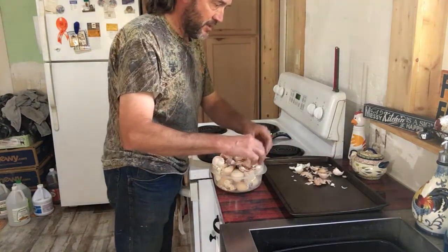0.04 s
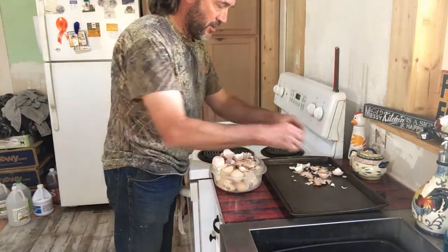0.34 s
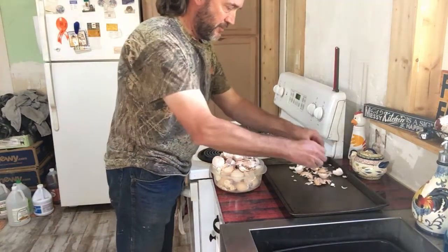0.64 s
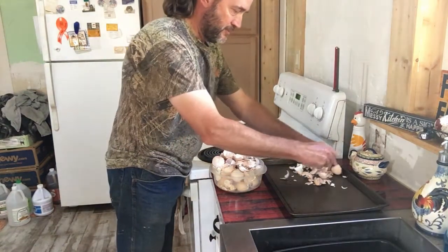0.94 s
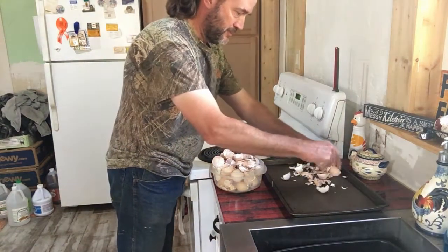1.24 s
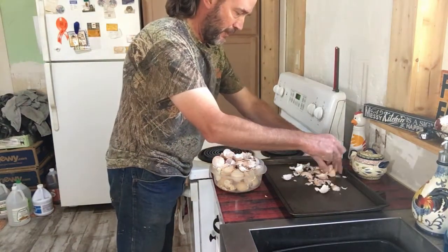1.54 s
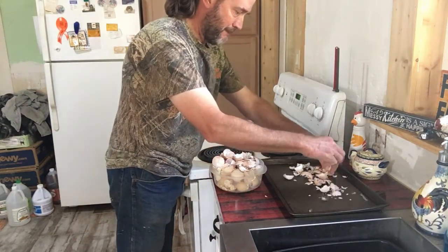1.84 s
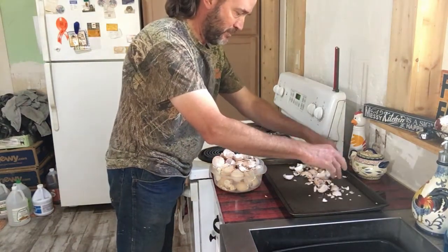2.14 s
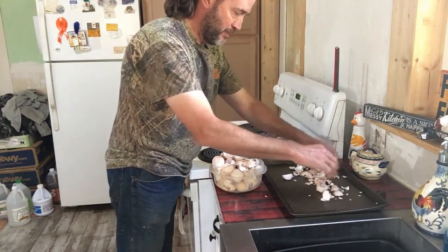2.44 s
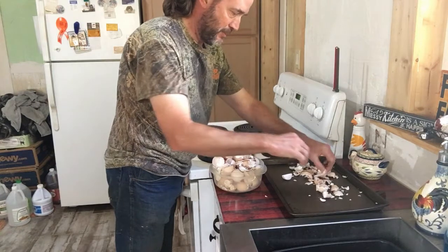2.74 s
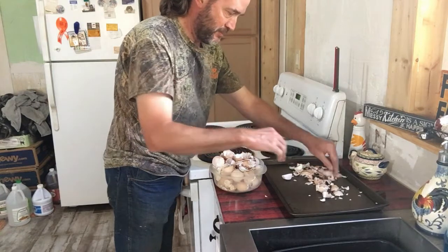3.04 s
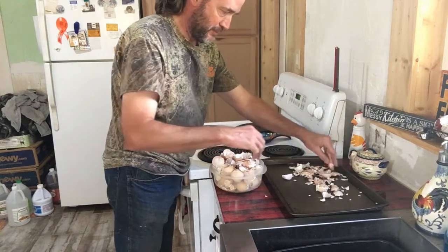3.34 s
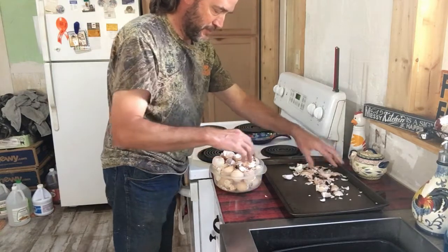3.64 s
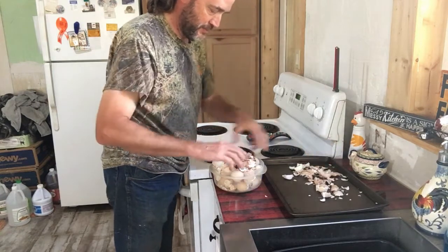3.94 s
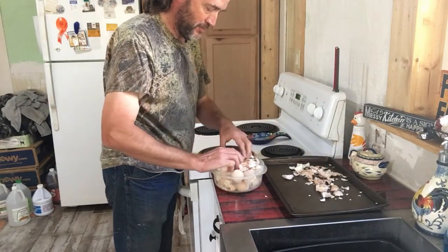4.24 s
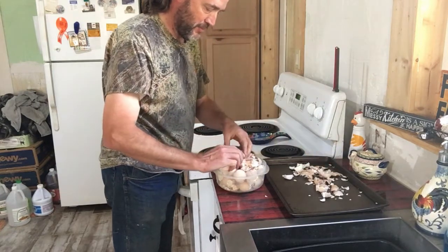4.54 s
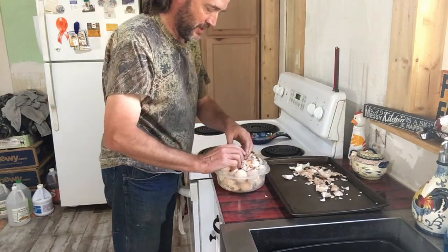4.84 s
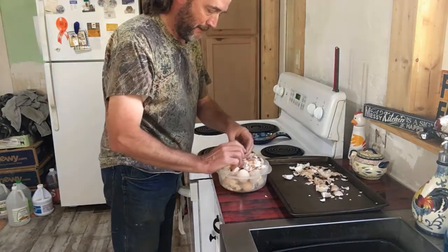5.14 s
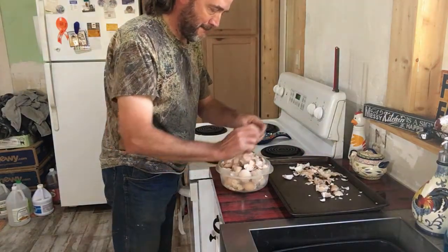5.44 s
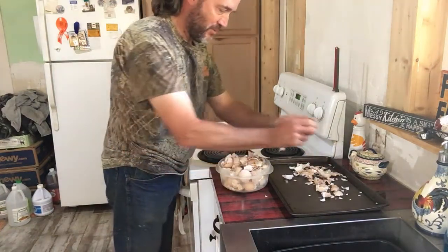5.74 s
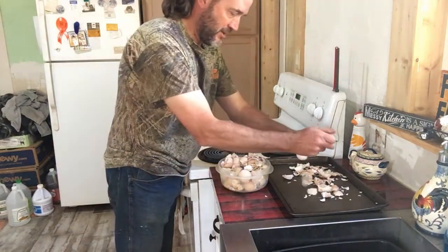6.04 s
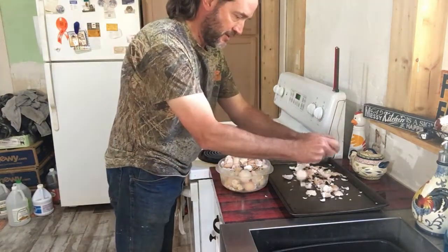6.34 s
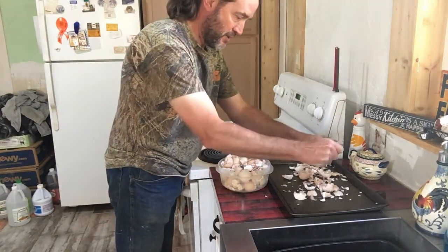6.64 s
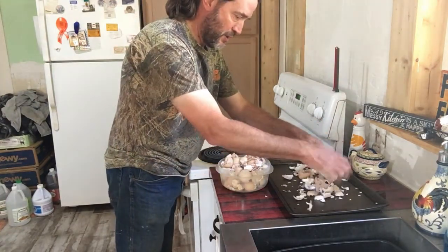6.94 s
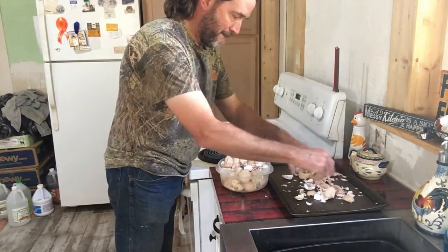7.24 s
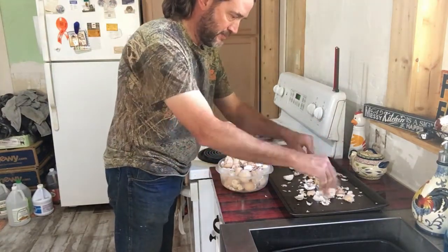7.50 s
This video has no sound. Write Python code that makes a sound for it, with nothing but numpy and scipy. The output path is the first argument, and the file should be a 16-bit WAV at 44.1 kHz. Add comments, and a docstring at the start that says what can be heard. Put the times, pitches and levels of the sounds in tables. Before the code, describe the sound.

In a small kitchen with a steady low hum, brittle eggshells snap and crunch between fingers, heard from nearby. Fragments tick onto a metal tray and one piece rocks to rest. After a quieter stretch of shells rubbing and knocking in a bowl, the crushing starts again with one loud, thumping crack, then more crackling and falling pieces before the sound cuts off.

```python
"""Dry eggshells crunch in the hands over a metal baking sheet; more are picked from a bowl and crushed. Each
crunch is an avalanche of tiny cracks that ring fragments, snap in the treble and rattle the sheet. Flakes
crackle between crunches, edges scrape on hollow shells, pieces drop and one rocks to rest, and a knuckle knocks
the sheet with a thump. A small bright kitchen and a low hum surround it all."""
import sys
import numpy as np
from scipy import signal
from scipy.fft import rfft, irfft
from scipy.io import wavfile
from scipy.ndimage import uniform_filter1d

SR = 44100
rng = np.random.default_rng(int(sys.argv[2]) if len(sys.argv) > 2 else 0)


def to_wav(s):
    """Save 16-bit WAV."""
    ch = np.atleast_2d(s).T  # columns
    pcm = np.round(np.clip(ch, -1, 1) * 32767)  # PCM
    wavfile.write(sys.argv[1], SR, pcm.astype(np.int16))


N = 342645
TIME = np.arange(N) / SR
TEN_MS = SR // 100

# tone of the room's steady noise: (frequency [Hz], level [dB])
ROOM_TONE_EQ = [(20, -8.5), (60, 4.5), (95, 0), (130, -6), (450, -12), (900, -16.5), (1900, -12),
                (2300, -6), (2700, -13.5), (5800, -22), (7500, -35.5), (16000, -41)]
# fingers digging into the bowl of shells: (time [s], hold [s], level [dB])
BOWL_DIGS = [(0, 0.019, -50), (4.15, 0.19, -41.5), (4.47, 0.026, -42), (4.68, 0.023, -44.5),
             (4.87, .04, -45), (5.11, .12, -45), (5.42, 0.087, -40.5), (5.64, 0.0086, -41)]
# shells knocking against the bowl: (time [s], level [dB])
BOWL_KNOCKS = [(4.124, -41.5), (4.28, -33.5), (4.819, -34)]
# hollow tone of the bowl: (frequency [Hz], level [dB])
BOWL_EQ = [(100, -6.5), (400, -30.5), (590, -2), (770, -18.5), (1000, -6), (2000, -3.5), (3000, -3.5),
           (4400, -5), (8000, -17.5), (16000, -21)]
# shell snaps, except the last two rows, which mimic bright splashes of overload distortion
# on the loudest crunch: (time [s], level [dB], pitch [Hz])
BRIGHT_ACCENTS = [(.113, -52, 5000), (.167, -44.5, 3040), (.436, -25.5, 1460), (.515, -29, 3120),
                  (.528, -29, 3100), (.563, -27, 2750), (1.098, -24, 4500), (1.871, -25, 3100),
                  (2.807, -39, 12100), (2.852, -38, 4700), (2.894, -33.5, 4030), (2.933, -35, 4300),
                  (3.654, -45.5, 3450), (5.095, -44.5, 4290), (5.148, -51, 11000), (5.863, -36.5, 3550),
                  (6.4, -20.5, 9000), (6.404, -27, 11700)]
# shell giving way in the hands: (time [s], level [dB], die-away [s], treble send [dB])
SHELL_BREAKS = [(.322, -45.5, 0.0021, -1), (.578, -16.5, .008, -9.5), (.722, -25.5, 0.0056, 0),
                (.793, -21, .005, -5.5), (.881, -17.5, 0.0059, -18), (.96, -15.5, 0.0079, -13),
                (1.382, -19, 0.0048, -17), (1.473, -12, 0.0069, -12.5), (1.649, -20.5, .004, -16),
                (1.778, -17, .01, -6.5), (1.805, -20, 0.0077, -10), (1.871, -25.5, .005, -7),
                (1.927, -25.5, 0.012, -9), (2.061, -26, 0.0059, -8), (2.183, -22.5, 0.0075, -16),
                (2.327, -26, 0.012, -4), (2.57, -32, .027, -21), (3.072, -32, 0.026, -10),
                (3.141, -26.5, 0.013, -11.5), (5.797, -30, 0.0068, -5.5), (5.906, -27, 0.0073, 2.5),
                (6.029, -19, .003, -6), (6.061, -13, .011, -7.5), (6.131, -15, .014, -12.5),
                (6.373, -14, 0.024, -11.5), (6.398, -2.5, .005, -16), (6.569, -14.5, 0.0064, -7),
                (6.737, -25, 0.00097, -17), (6.836, -26, 0.0074, -4), (6.952, -24, 0.0069, -11),
                (7.04, -17.5, 0.0037, -13.5), (7.085, -20, 0.0063, -7.5)]
# centre pitch of the breaking pieces, lowest while a shell is still whole: (time [s], pitch [Hz])
FRAGMENT_PITCH = [(.58, 2000), (.8, 4300), (1.47, 4300), (1.65, 3400), (3.15, 3100), (6.03, 2700),
                  (6.1, 3600), (6.4, 3150), (6.85, 3900), (7.05, 2950)]
# body of cracking shell: (frequency [Hz], level [dB])
SHELL_EQ = [(200, -54.5), (700, -23), (1200, -15), (1600, -4), (3000, -1.5), (6400, 0.5), (7600, -5),
            (16000, -25.5)]
# crisp top of a crack: (frequency [Hz], level [dB])
TREBLE_EQ = [(1000, -50), (5000, -5), (7500, 3), (10000, 3), (12500, 5), (16000, -3)]
# how hard breaks rattle the sheet, faint while the hands are still coming down: (time [s], send [dB])
RATTLE_SEND = [(.58, -32), (.8, -24), (.88, -12), (2.4, -13), (5.8, -16.5), (7.1, -13.5)]
# tone of the sheet's rattle: (frequency [Hz], level [dB])
RATTLE_EQ = [(60, -35.5), (180, -15), (310, -9.5), (640, -10), (800, 1.5), (1300, 4.5), (1900, -18),
             (5000, -34)]
# ringing modes of the baking sheet: (frequency [Hz], level [dB], t60 [s])
SHEET_MODES = [(326, -12, .2), (1040, -9.5, .15), (1746, -0.5, 0.1), (2420, -14, 0.35), (2670, -3, 0.51),
               (2810, 3.5, .2), (3050, -2, 0.097), (4300, -0.5, 0.17)]
# fingers tightening on the flakes: (time of full grip [s], hold [s], level [dB])
SQUEEZES = [(.42, .09, -43), (.59, .05, -32.5), (.82, 0.33, -34), (1.28, 0.096, -35.5), (1.45, .03, -26),
            (1.68, 0.014, -32.5), (2.0, 0.11, -35.5), (2.37, 0.011, -41.5), (2.62, 0.03, -39),
            (2.82, .05, -45), (5.93, .04, -30), (6.08, 0.025, -24.5), (6.35, 0.11, -36.5),
            (6.61, 0.087, -30.5), (6.98, 0.13, -33.5)]
# edges on a half shell: (start [s], end [s], opening level [dB], first pitch [Hz], last pitch [Hz])
SHELL_SCRAPES = [(.435, 0.562, -43, 1350, 1480), (0.469, 0.571, -37, 3100, 2980),
                 (0.576, 0.694, -33, 1900, 1720), (.76, .867, -48, 1720, 1730),
                 (4.109, 4.271, -43, 1490, 1650), (4.45, 4.596, -44, 1900, 2050),
                 (5.889, 5.989, -36, 1260, 1520), (6.031, 6.12, -33.5, 1440, 1610)]
# pieces dropped onto the sheet: (time [s], level [dB], die-away [s])
LANDINGS = [(.974, -16.5, .01), (1.097, -24, 0.0049), (1.143, -25, 0.0031), (2.199, -24, .008),
            (6.886, -27, .0076), (7.157, -22, 0.0075), (7.343, -26.5, .02)]
# dull tone of a knuckle knocking the sheet: (frequency [Hz], level [dB])
THUMP_EQ = [(40, -12), (200, -5.5), (330, -2), (600, -2.5), (4000, -39.5)]


def undb(db):
    """Decibels to gain."""
    return 10 ** (np.asarray(db) / 20)


def unit(x):
    """Scale to an energy of one."""
    return x / np.sqrt(np.sum(x ** 2))


def ring(x, response):
    """Drive an impulse response with x."""
    return signal.fftconvolve(x, response)[:N]


def colour(eq, size=2048):
    """Minimum-phase response of unit energy that follows an EQ curve."""
    hz, db = np.transpose(eq)
    grid = np.maximum(np.fft.rfftfreq(size, 1 / SR), 1)
    curve_db = np.interp(np.log(grid), np.log(hz), db)
    cepstrum = irfft(np.log(undb(curve_db)))
    cepstrum[1:size // 2] *= 2
    cepstrum[size // 2 + 1:] = 0
    return unit(irfft(np.exp(rfft(cepstrum))))


def fade(t, t60):
    """Envelope that falls 60 dB in t60 seconds."""
    return np.exp(-np.log(1000) * t / t60)


def place(times, sounds):
    """Mix short sounds (one a row) into a track at their times."""
    starts = (np.ravel(times) * SR).astype(int)[:, None]
    sounds = np.reshape(sounds, (len(starts), -1))
    samples = np.maximum(starts + np.arange(sounds.shape[1]), 0)
    return np.bincount(samples.ravel(), sounds.ravel(), N)[:N]


def fragments(hz, cycles, size=256):
    """One damped ping of unit energy for each pitch, with its decay time given in cycles."""
    turns = np.clip(np.ravel(hz), SR / 100, SR / 3)[:, None] * np.arange(size) / SR
    pings = np.sin(2 * np.pi * turns) * np.exp(-turns / cycles)
    return pings / np.linalg.norm(pings, axis=1, keepdims=True)


def effort(strokes, rise_db_per_s, fall_db_per_s):
    """Envelope of finger strokes that each swell, hold and release."""
    curves_db = []
    for time, hold_s, db in strokes:
        attack_db = rise_db_per_s * np.maximum(time - TIME, 0)
        release_db = fall_db_per_s * np.maximum(TIME - time - hold_s, 0)
        curves_db.append(db - attack_db - release_db)
    return undb(np.max(curves_db, axis=0))


def crackle(envelope, hz, per_s, scatter_db, pitch_spread, cycles):
    """Random cracks of uneven size ride an envelope; returns their pings and their bare clicks."""
    count = int(per_s * N / SR)
    at = rng.integers(0, N, count)
    polarity = rng.choice([-1, 1], count)
    strength = undb(scatter_db * np.clip(rng.standard_normal(count), -2, 2))
    force = unit(polarity * strength) * np.sqrt(N) * envelope[at]
    pitch = hz * np.exp(pitch_spread * rng.standard_normal(count))
    return place(at / SR, force[:, None] * fragments(pitch, cycles)), place(at / SR, force)


def crunches(times, db, die_s, hz, treble_db, blow_db, pitch_spread=.46, cycles=1.8, count=56):
    """One crack sets off an avalanche; returns its body, its treble and its blows on what lies below."""
    columns = np.array(np.broadcast_arrays(times, db, die_s, hz, treble_db, blow_db))
    times, db, die_s, hz, treble_db, blow_db = columns[:, :, None]
    shape = (len(times), count)
    crack = np.arange(count)
    progress = (crack + rng.random(shape) * (crack > 0)) / count
    onsets = times + die_s * (-np.log(1 - progress)) ** .8  # gathers for a moment, then thins out
    force = undb(6 * np.clip(rng.standard_normal(shape), -2, 2))
    force[:, 0] = undb(5)  # a firm first crack gives the attack
    force /= np.linalg.norm(force, axis=1, keepdims=True)
    force *= rng.choice([-1, 1], shape) * undb(db) * np.sqrt(TEN_MS)
    pitch = hz * np.exp(pitch_spread * rng.standard_normal(shape))
    pings = place(onsets, force.reshape(-1, 1) * fragments(pitch, cycles))
    body = undb(-3.5) * ring(pings, colour(SHELL_EQ))
    return body, place(onsets, force * undb(treble_db)), place(onsets, force * undb(blow_db))


def room_tone(noise_db=-54.5, hum_hz=74, hum_db=-63.5, waver=.3, points=64):
    """A bed of steady room noise and the wavering hum of an appliance."""
    drift = np.interp(TIME, np.linspace(0, TIME[-1], points), rng.standard_normal(points))
    hum = np.sqrt(2) * np.sin(2 * np.pi * hum_hz * TIME) * (1 + waver * drift)
    noise = ring(rng.standard_normal(N), colour(ROOM_TONE_EQ, size=8192))
    return undb(noise_db) * noise + undb(hum_db) * hum


def bowl(tick_db=-10):
    """Shells rub and knock in the hollow of the bowl; returns that rummaging and the ticks of edges."""
    digging = effort(BOWL_DIGS, rise_db_per_s=220, fall_db_per_s=53.5)
    _, rubbing = crackle(digging, hz=3000, per_s=380, scatter_db=6.5, pitch_spread=0, cycles=1)
    ticks, _ = crackle(digging, hz=3680, per_s=130, scatter_db=3, pitch_spread=.56, cycles=2)
    times, db = np.transpose(BOWL_KNOCKS)
    body, treble, blows = crunches(times, db, die_s=.004, hz=1900, treble_db=-36, blow_db=-1.5,
                                   pitch_spread=.21, cycles=2.4)
    return ring(rubbing + blows, colour(BOWL_EQ)) + body, undb(tick_db) * ticks + treble


def reflections(early_db=-7, late_db=-4, early_t60=.077, low_t60=.41, high_t60=.37, split_hz=6500):
    """Quick reflections off counter and wall, then a tail whose treble dies first."""
    t = TIME[:int(SR * .6)]
    early, late, airy = rng.standard_normal((3, len(t))) * (t > .0015)  # pre-delay
    low = signal.sosfilt(signal.butter(2, split_hz, fs=SR, output="sos"), late)
    high = signal.sosfilt(signal.butter(2, split_hz, "high", fs=SR, output="sos"), airy)
    tail = unit(low * fade(t, low_t60) + high * fade(t, high_t60))
    return undb(early_db) * unit(early * fade(t, early_t60)) + undb(late_db) * tail


def kitchen(cracks, spots=4, block=64):
    """Cracks spring from different spots in the hands, each with its own pattern of reflections."""
    spot = np.repeat(rng.integers(0, spots, N // block + 1), block)[:N]
    crossfades = [uniform_filter1d(1. * (spot == k), block) for k in range(spots)]
    return sum(ring(cracks * np.sin(np.pi / 2 * share), reflections()) for share in crossfades)


def bright_accents(edge_ratio=2.2, edge_db=-7, low_cut_hz=1000):
    """Hard-edged pings with no bass play shell snaps and two overload splashes on the loudest crunch."""
    times, db, hz = np.transpose(BRIGHT_ACCENTS)
    ping = fragments(hz, cycles=4, size=768)
    edge = fragments(edge_ratio * hz, cycles=.51, size=768)  # the click of the attack
    force = undb(db) * np.sqrt(TEN_MS)
    track = place(times, force[:, None] * (ping + undb(edge_db) * edge))
    return signal.sosfilt(signal.butter(3, low_cut_hz, "high", fs=SR, output="sos"), track)


def breaks():
    """Shells cave in between the fingers, just above the sheet."""
    times, db, die_s, treble_db = np.transpose(SHELL_BREAKS)
    hz = np.interp(times, *np.transpose(FRAGMENT_PITCH))
    blow_db = np.interp(times, *np.transpose(RATTLE_SEND))
    return crunches(times, db, die_s, hz, treble_db, blow_db)


def sheet(blows, cracks, sing_db=-17):
    """The sheet rattles under falling pieces, and its modes sing faintly along with the cracks."""
    t = TIME[:SR // 2]
    modes = sum(undb(db) * np.sin(2 * np.pi * hz * t) * fade(t, t60) for hz, db, t60 in SHEET_MODES)
    singing = ring(blows + .5 * cracks, unit(modes))
    return ring(blows, colour(RATTLE_EQ)) + undb(sing_db) * singing


def kneading(body_db=-3, treble_db=-10, blow_db=-14):
    """Loose flakes crackle as the fingers grind them; returns body, treble and patter on the sheet."""
    grip = effort(SQUEEZES, rise_db_per_s=158, fall_db_per_s=106)
    pings, clicks = crackle(grip, hz=2970, per_s=800, scatter_db=4, pitch_spread=.54, cycles=1.8)
    body = undb(body_db) * ring(pings, colour(SHELL_EQ))
    return body, undb(treble_db) * clicks, undb(blow_db) * clicks


def scrapes(slips_per_s=300, fade_db_per_s=45, scatter_db=2, pitch_spread=.065):
    """Rough edges stick and slip on a half shell, ringing its hollow; the pitch moves with the grip."""
    track = np.zeros(N)
    for start, end, db, first_hz, last_hz in SHELL_SCRAPES:
        count = int(slips_per_s * (end - start))
        times = np.sort(rng.uniform(start, end, count))
        slip_db = db - fade_db_per_s * (times - start) + scatter_db * rng.standard_normal(count)
        force = np.sqrt(SR / slips_per_s) * undb(slip_db)
        glide_hz = np.interp(times, [start, end], [first_hz, last_hz])
        pitch = glide_hz * np.exp(pitch_spread * rng.standard_normal(count))
        track += place(times, force[:, None] * fragments(pitch, cycles=6, size=768))
    return track


def landings():
    """Dropped pieces land duller than a break and rattle the sheet hard."""
    times, db, die_s = np.transpose(LANDINGS)
    return crunches(times, db, die_s, hz=2700, treble_db=-12, blow_db=-6)


def rocking(start_s=3.245, first_gap_s=.074, min_gap_s=.048, gap_kept=.35, first_db=-34.5, loss_db=2.5):
    """A curved piece taps the sheet ever faster and softer until it lies still."""
    tap = np.arange(6)
    gaps = min_gap_s + (first_gap_s - min_gap_s) * gap_kept ** tap
    times = start_s + np.cumsum(gaps) - gaps
    return crunches(times, first_db - loss_db * tap, die_s=.0045, hz=3450, treble_db=-13, blow_db=-15)


def thump(time_s=6.399, db=-22, t60=.035):
    """A knuckle knocks the sheet once with a tight, dull thump."""
    t = TIME[:SR // 8]
    burst = rng.standard_normal(len(t)) * fade(t, t60)
    knock = unit(ring(burst, colour(THUMP_EQ)))
    return place([time_s], undb(db) * np.sqrt(TEN_MS) * knock)


def scene(direct_db=-4, sharp_direct_db=-3.5, sharp_room_db=-2, free_sheet_db=7.5):
    """Shells, sheet and bowl play into the kitchen; the sharpest cracks sit drier and further forward."""
    taps = rocking()
    body, treble, blows = np.sum([breaks(), landings(), taps, kneading()], axis=0)
    rummaging, ticks = bowl()
    in_hand = body + scrapes()
    tap_drive = undb(free_sheet_db) * taps[0]  # with no hand on it, the sheet sings more
    on_counter = sheet(blows, body + tap_drive) + rummaging
    sharp = ring(treble, colour(TREBLE_EQ)) + bright_accents() + ticks
    direct = undb(direct_db) * (in_hand + on_counter) + undb(sharp_direct_db) * sharp
    reverb = kitchen(in_hand + undb(sharp_room_db) * sharp) + ring(on_counter, reflections())
    return (direct + reverb + thump() + room_tone())[None]


def record(dry, stop_s=7.385, high_cut_hz=16000):
    """Soft clipping rounds the loudest peaks, the sound stops dead and a steep filter trims the top."""
    rounded = np.tanh(dry) * (TIME < stop_s)
    return signal.sosfilt(signal.ellip(10, .1, 70, high_cut_hz, fs=SR, output="sos"), rounded)


dry = scene()
out = record(dry)
to_wav(out)
```